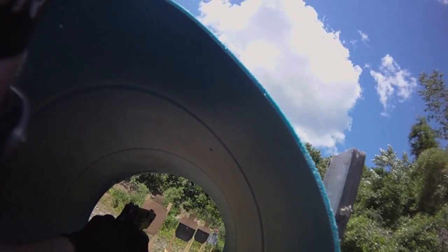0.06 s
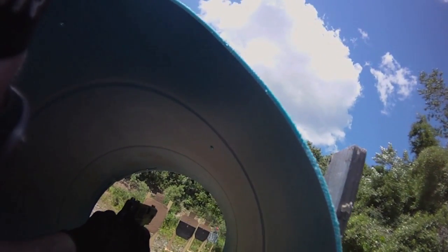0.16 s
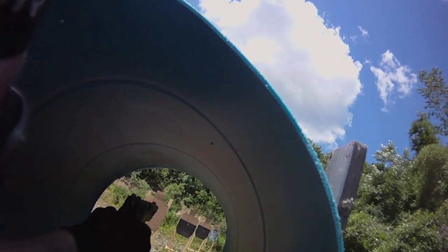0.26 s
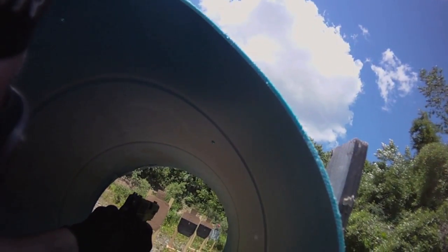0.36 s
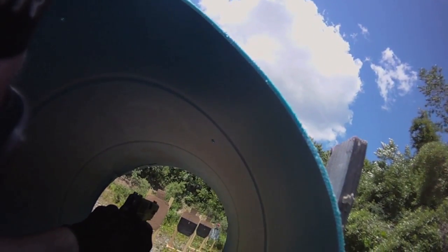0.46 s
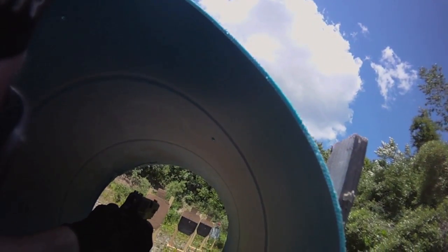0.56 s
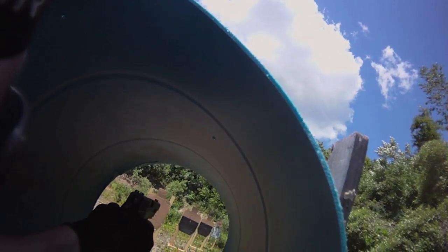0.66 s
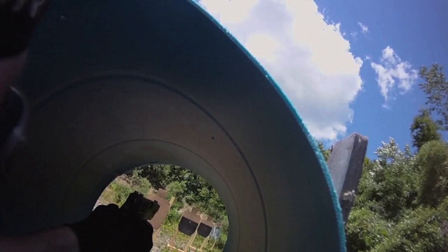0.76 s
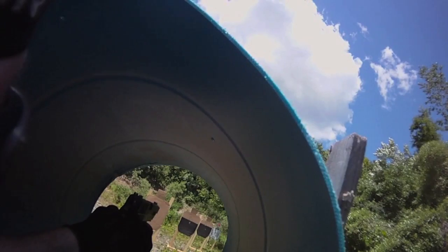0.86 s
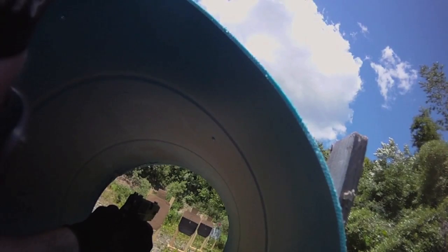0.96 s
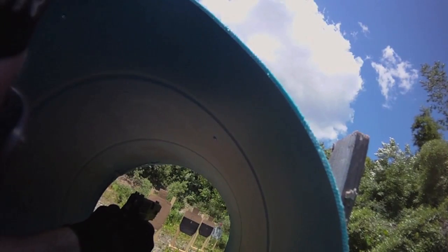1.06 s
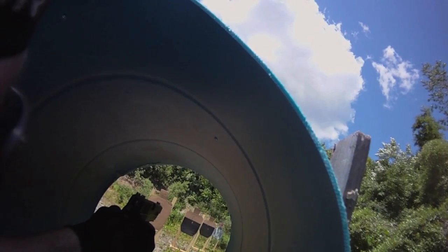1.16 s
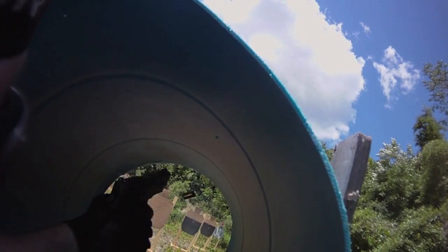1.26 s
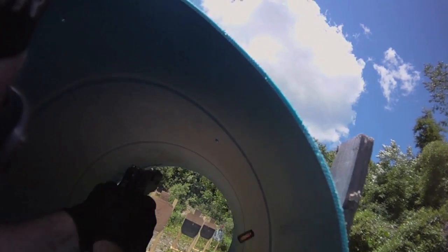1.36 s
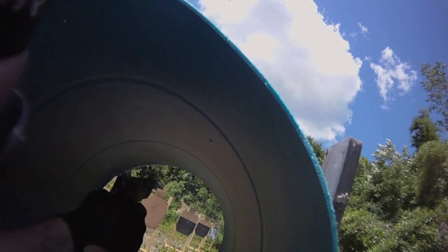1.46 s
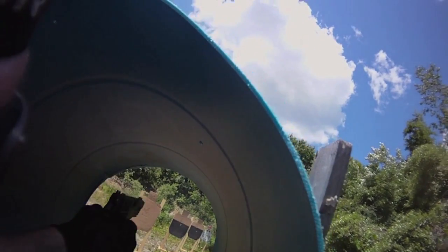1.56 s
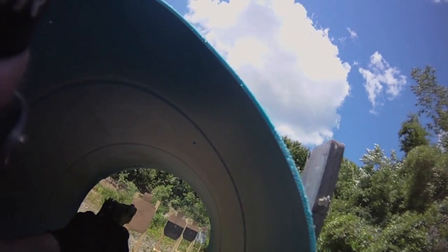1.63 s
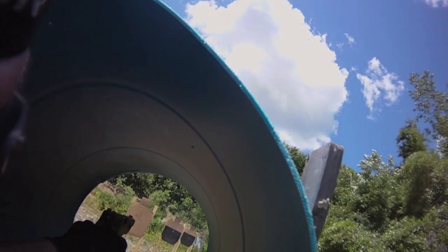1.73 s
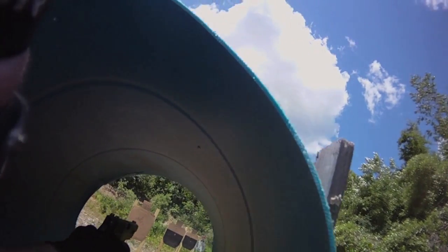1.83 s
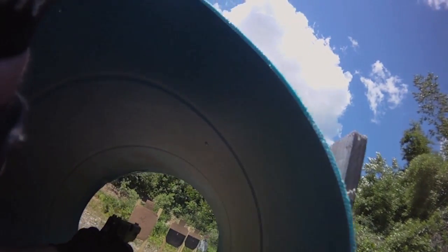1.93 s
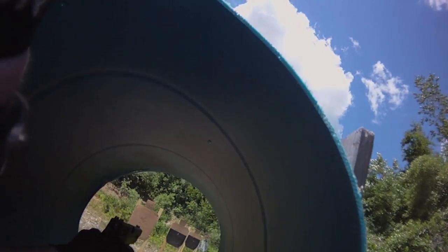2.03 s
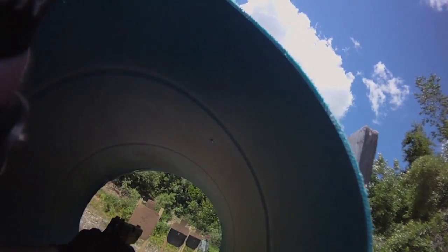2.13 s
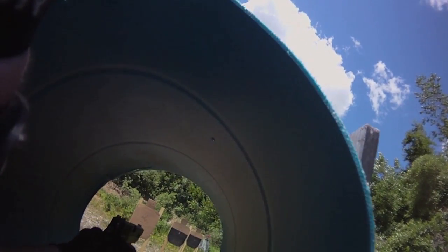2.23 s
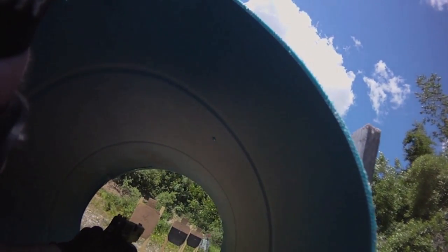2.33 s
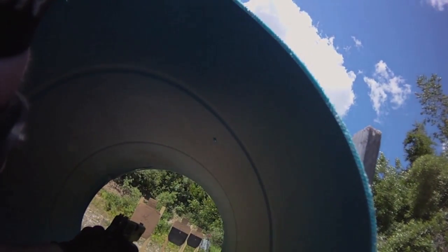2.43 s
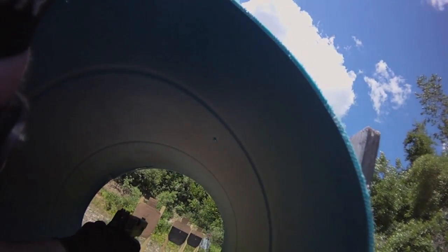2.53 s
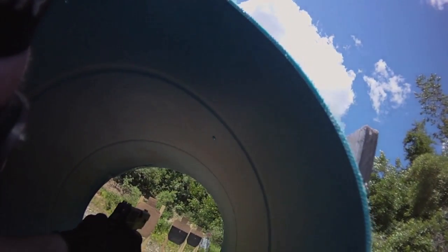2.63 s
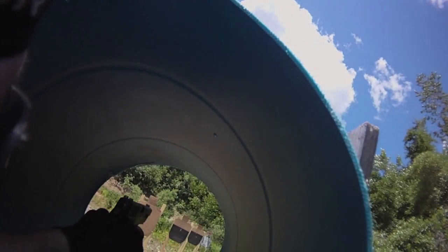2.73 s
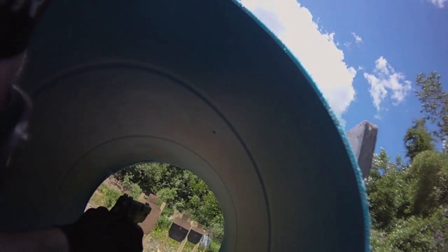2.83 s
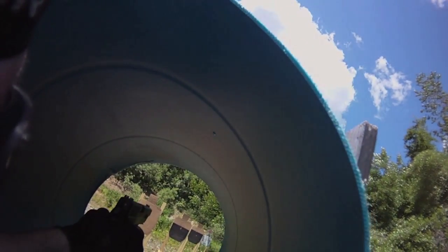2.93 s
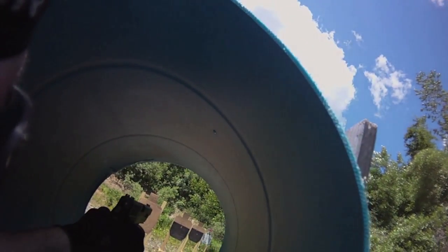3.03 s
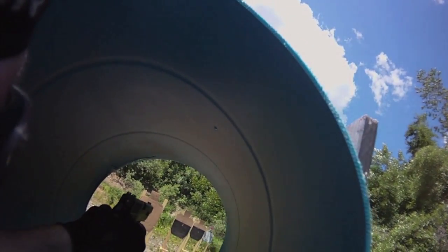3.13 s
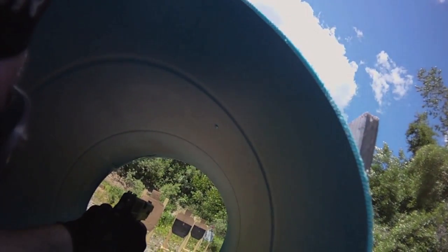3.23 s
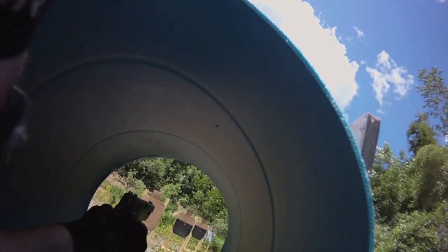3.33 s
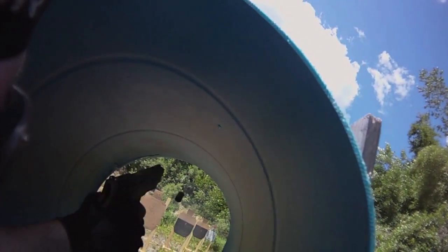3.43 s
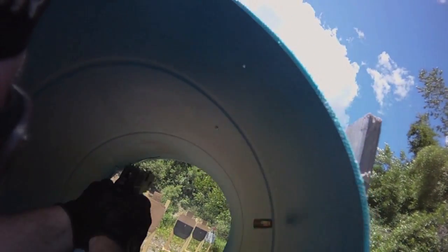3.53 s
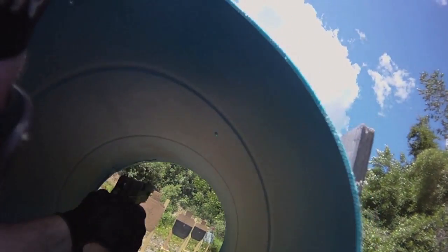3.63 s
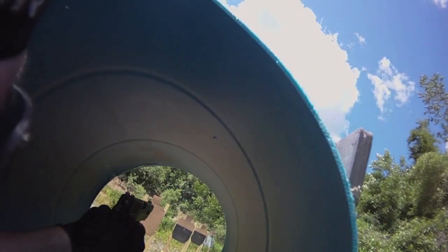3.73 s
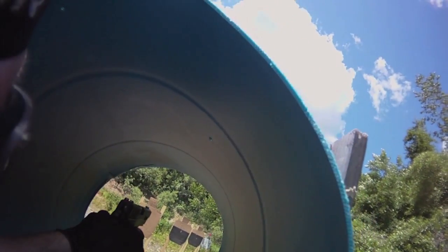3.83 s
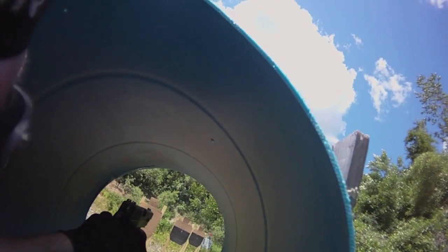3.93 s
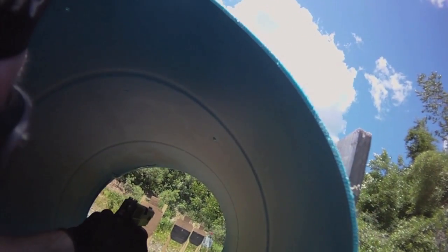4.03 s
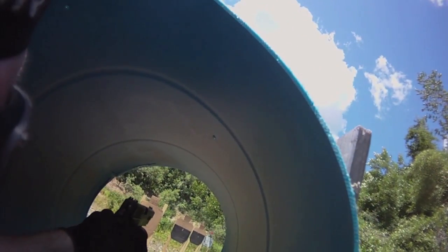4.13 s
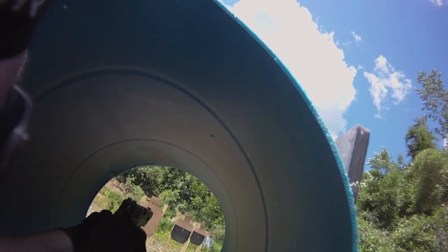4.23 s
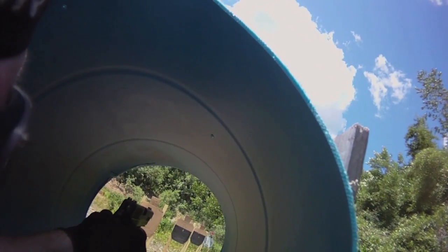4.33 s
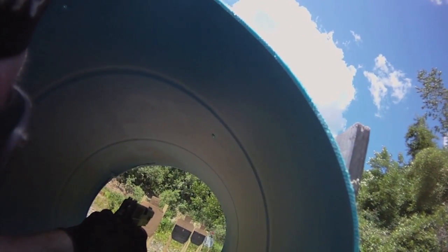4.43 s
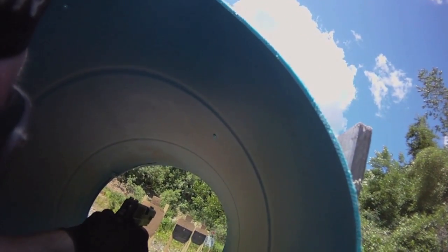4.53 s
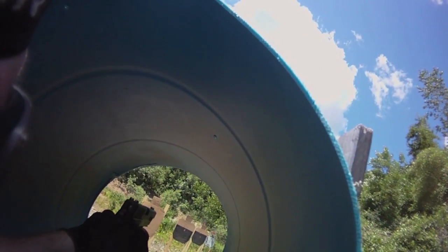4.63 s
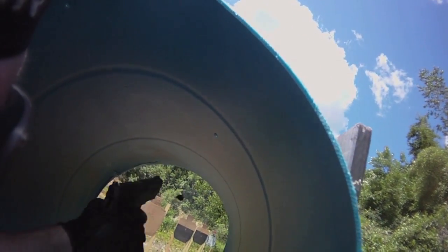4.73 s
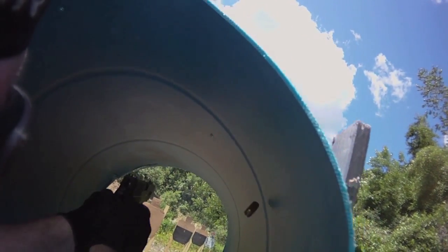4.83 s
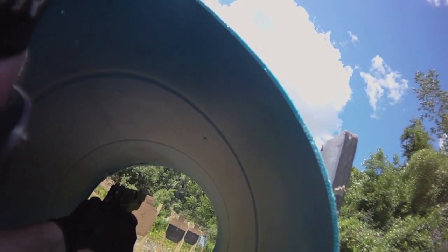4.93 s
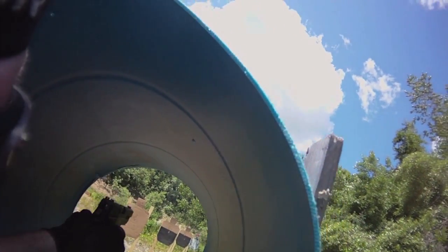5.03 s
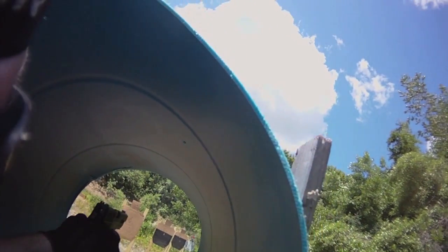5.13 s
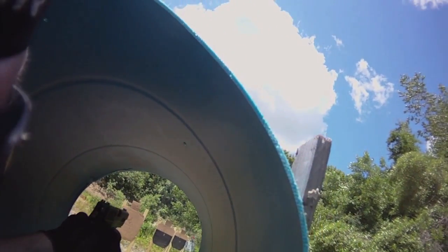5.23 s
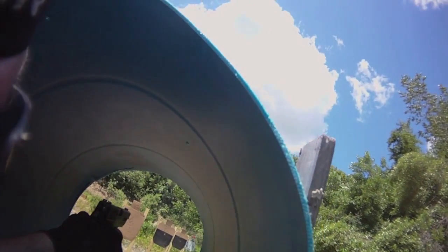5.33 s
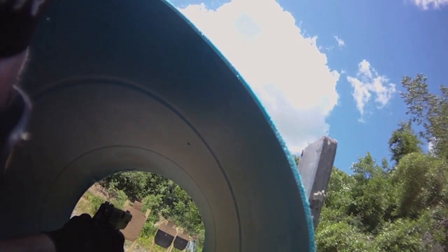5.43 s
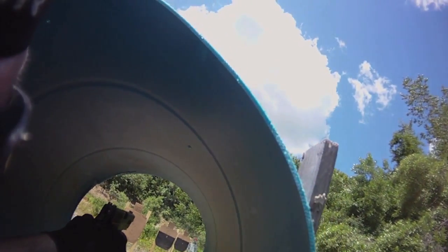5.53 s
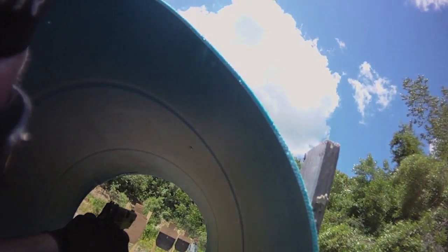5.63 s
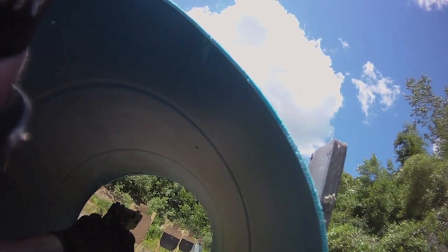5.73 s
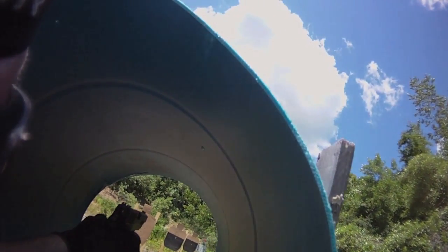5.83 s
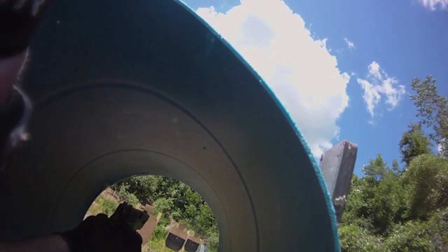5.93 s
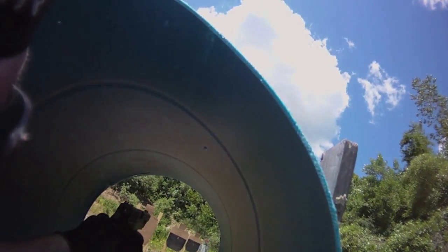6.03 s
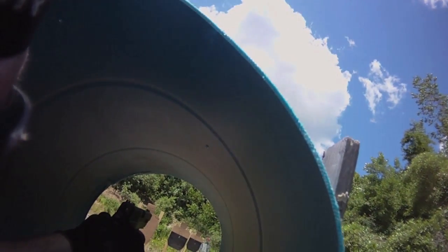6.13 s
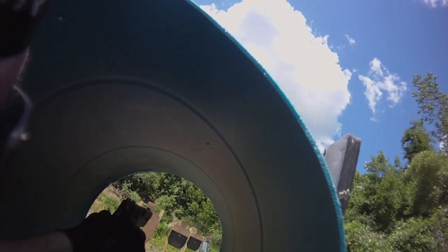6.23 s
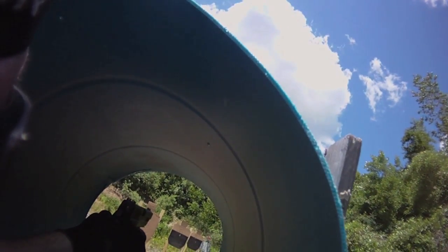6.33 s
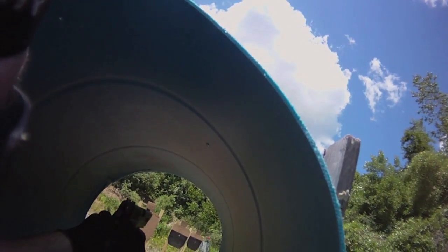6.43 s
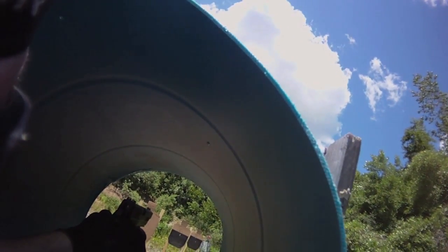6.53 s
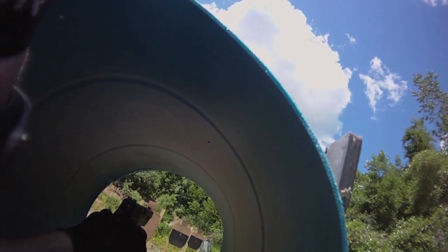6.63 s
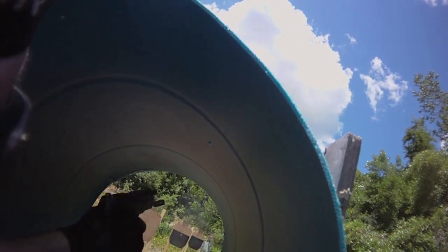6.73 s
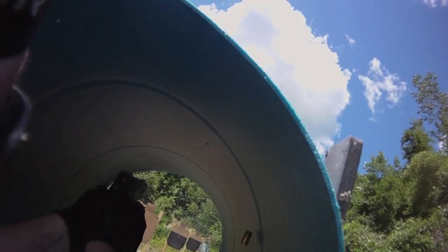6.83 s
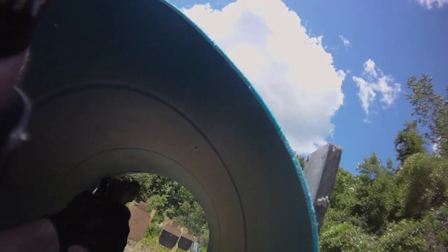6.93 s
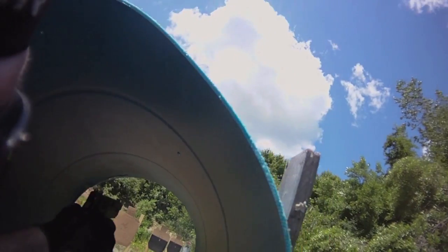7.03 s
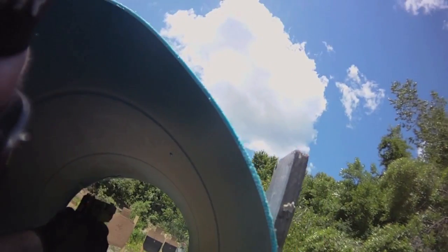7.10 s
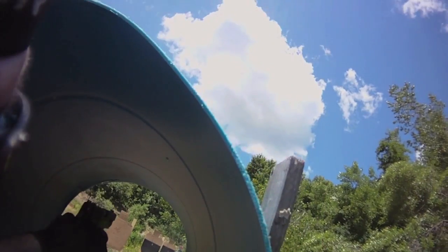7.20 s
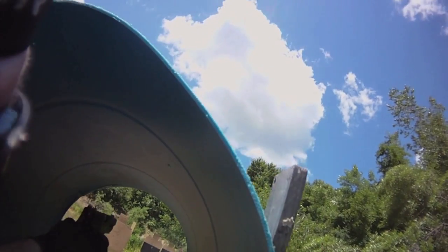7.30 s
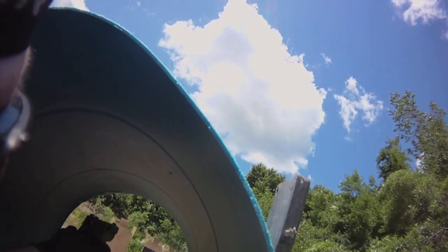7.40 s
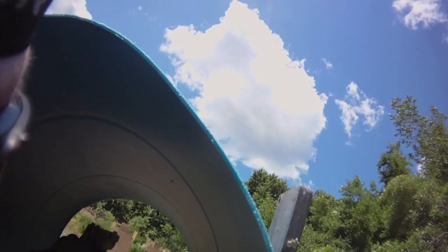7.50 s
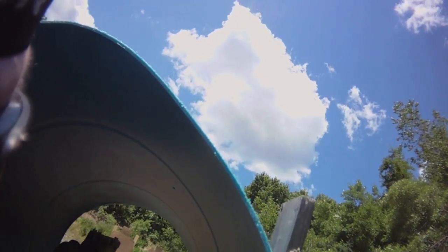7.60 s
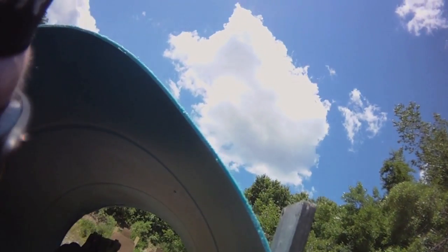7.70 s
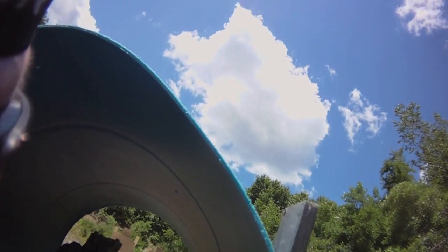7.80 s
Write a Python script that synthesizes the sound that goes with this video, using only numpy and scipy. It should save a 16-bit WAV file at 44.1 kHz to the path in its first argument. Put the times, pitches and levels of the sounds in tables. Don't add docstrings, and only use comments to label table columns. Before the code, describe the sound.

Close pistol fire, four spaced blasts with short hollow drum ring and woodland echo, brass cases rattling between, faint birds and one distant shot near the end.

```python
import sys
import numpy as np
from scipy import signal
from scipy.io import wavfile
from scipy.ndimage import uniform_filter1d

SR = 44100
rng = np.random.default_rng(int(sys.argv[2]) if len(sys.argv) > 2 else 0)


def pcm_store(signal):
    levels = np.round(np.clip(np.atleast_2d(signal), -1, 1) * 32767)
    wavfile.write(sys.argv[1], SR, levels.astype(np.int16).T)


def rack_gain(trim_db):
    fader = np.asarray(trim_db, float)
    return 10 ** (fader / 20)


N = 346626
CEILING = .78


def evened(x):
    return x / np.sqrt(np.mean(x ** 2) + 1e-20)


def read(points, hz):
    f, value = np.transpose(points)
    return np.interp(np.log(hz + 1), np.log(f + 1), value)


def curve(points, t):
    return np.interp(t, *np.transpose(points))


def add(mix, s, sound):
    part = mix[round(s * SR):][:len(sound)]
    part += sound[:len(part)]


def resonate(x, hz, width):
    turn = np.exp(2j * np.pi * np.cumsum(hz * np.ones(len(x))) / SR)
    pole = np.exp(-np.pi * abs(width) / SR)
    smooth = signal.lfilter([1 - pole], [1, -pole], x / turn)
    return 2 * (turn * smooth).real


def noise(colour, size, loss_db=None, patchy_db=5.5, flicker_db=-0.34):
    frames, hz = size // 128 + 5, np.fft.rfftfreq(512, 1 / SR)[:, None]
    a, b, patches = rng.standard_normal((frames, len(hz), 3)).T
    flicker = evened(uniform_filter1d(patches[0], size=3))
    patches = uniform_filter1d(patches, size=6, axis=0)
    patches = evened(uniform_filter1d(patches, size=8, axis=1))
    shape = rack_gain(read(colour, hz))
    shape = shape / np.sqrt(np.mean(shape ** 2)) / np.sqrt(2 * 384)
    z = (a + 1j * b) * shape * rack_gain(patchy_db * patches + flicker_db * flicker)
    if loss_db:
        z = z * rack_gain(loss_db(hz, np.arange(frames) * 128 / SR))
    return 2 * signal.istft(z, nperseg=512, noverlap=384)[1][:size]


# top t/s, top level/dB, hold t/s, fade/(dB/s)
RUMBLE_SWELLS = [
    (0, -58.5, 0.059, -10.5),
    (2.199, -59, 0.18, -27.5),
    (4.3, -59, .05, -39),
    (5.501, -58, 0.66, -240),
    (6.593, -77, 0.18, -31),
    (7.499, -54.5, .1, -18),
]


def swelling(t):
    top, db, hold, fade_db = np.transpose(RUMBLE_SWELLS)[:, :, None]
    rise_db = 25
    level = db + rise_db * np.minimum(t - top, 0) + fade_db * np.maximum(t - top - hold, 0)
    return np.sqrt((rack_gain(level) ** 2).sum(axis=0))


# f/Hz, level/(dB per Hz)
RUMBLE_SPECTRUM = [(50, -29.5), (120, -32.5), (172, -17.5), (260, -33), (400, -8.5), (560, 3), (760, -4.5),
                   (1050, -8), (2200, -14), (4200, -21), (4800, -31), (8000, -38.5)]
# f/Hz, level/(dB per Hz)
HISS_SPECTRUM = [(30, -4.5), (100, -8.5), (200, -12), (330, -9), (560, 0), (800, -8.5), (1300, -12),
                 (2600, -12), (4200, -13.5), (4900, -16.5), (8000, -18), (15250, -20), (15450, -44)]
# f/Hz, level/dB
CAMERA_WHISTLES = [(5570, -97), (7790, -95), (11090, -92)]


def background():
    t = np.arange(N) / SR
    rumble = swelling(t) * noise(RUMBLE_SPECTRUM, size=N, patchy_db=1.0)
    hiss = rack_gain(-70.5) * noise(HISS_SPECTRUM, size=N, patchy_db=1.3)
    whistles = sum(rack_gain(db) * evened(resonate(rng.standard_normal(N), hz, 35)) for hz, db in CAMERA_WHISTLES)
    return rumble + hiss + whistles


def bird(length, start_hz, end_hz, db):
    hz = np.linspace(start_hz, end_hz, round(length * SR))
    wobble, leaves = rng.standard_normal((2, round(.08 * SR)))
    wobble = evened(uniform_filter1d(wobble, size=160))[:len(hz)]
    note = signal.windows.tukey(len(hz), .6) * np.sin(2 * np.pi * np.cumsum(hz) / SR + .5 * wobble)
    blur = leaves * np.exp(-np.arange(len(leaves)) / (.03 * SR))
    return rack_gain(db) * (np.pad(note, (0, len(blur) - 1)) + .02 * signal.fftconvolve(note, blur))


def knock(db, hz, rattle_s, thud_db, treble_db):
    t = np.arange(0, .1, 1 / SR)
    grit, fizz, hollow = rng.standard_normal((3, len(t)))
    wall = evened(resonate(resonate(grit, hz, 0.45 * hz), hz, .9 * hz))
    brass = resonate(resonate(fizz, 6600, 3000), 6600, 3000)
    brass = evened(brass + .13 * np.diff(fizz, prepend=0))
    thud = evened(resonate(resonate(resonate(hollow, 650, 400), 650, 400), 650, 600))
    fall = np.exp(-t / rattle_s) + 3 * np.exp(-t / .0006) + .08 * np.exp(-t / .018)
    swell = np.minimum(t / .004, 1) * np.exp(-t / .016)
    return rack_gain(db - 15.5) * ((wall + rack_gain(treble_db) * brass) * fall + rack_gain(thud_db) * thud * swell)


def chime(db, hz, free_s):
    t = np.arange(0, .4, 1 / SR)
    spin = uniform_filter1d(rng.standard_normal(len(t)), size=220)
    spin = evened(uniform_filter1d(spin, size=220))
    t60, linger_db = 0.4, -24
    damping_db = np.maximum(-900 * np.maximum(t - free_s, 0), linger_db)
    level = rack_gain(db - 60 * t / t60 + damping_db + 2.4 * spin)
    return level * np.sin(2 * np.pi * hz * t + .5 * spin) * np.minimum(t / 0.0013, 1)


# t/s, peak level/dB, centre f/Hz, brass treble level/dB
FLAT_LANDINGS = [(.1594, -56, 1990, -9), (1.5789, -11, 3220, -13), (1.6222, -19, 2300, -33),
                 (1.7195, -21, 2090, -14), (1.8584, -17.5, 1510, -33), (1.8686, -16, 1800, -31),
                 (1.8994, -22, 1910, -36), (2.596, -47, 4120, -36), (3.599, -5.5, 3080, -21.5),
                 (3.7832, -12, 1950, -23), (5.228, -14, 2050, -15), (5.2816, -26.5, 2580, -24),
                 (6.19, -37, 2930, -28.5), (7.239, -35, 1780, -25), (7.356, -41, 1590, -28.5)]
# t/s, peak level/dB, centre f/Hz, brass treble level/dB
RIM_LANDINGS = [(.187, -43.5, 5090, -5), (1.7358, -11, 3160, -22), (1.9188, -24.5, 1820, -35),
                (3.127, -58.5, 1610, -12), (3.7693, -12, 3730, -11), (4.8924, -11.5, 3060, -18),
                (4.9139, -26, 3030, 10), (5.044, -15.5, 2700, -8), (5.117, -7, 2300, -3.5),
                (5.2539, -23.5, 2610, -28), (5.805, -43, 1940, -25.5), (5.835, -43.5, 1950, -24.5),
                (5.9946, -38, 2730, -30.5), (6.172, -27.5, 2630, -33), (6.548, -58, 1980, -21),
                (7.0632, -11.5, 2060, -8.5), (7.089, -14.5, 3550, -20), (7.0964, -16.5, 2060, -6),
                (7.2015, -18, 4430, -17), (7.418, -39.5, 2330, -35), (7.458, -37, 2290, -30),
                (7.6035, -33.5, 1594, -14)]
# t/s, peak level/dB, f/Hz, free t/s before the wall damps them
BRASS_CHIMES = [(.1906, -62, 11393, 0.043), (1.49, -44, 11466, 0.031), (1.578, -34, 11350, 0.01),
                (1.64, -66, 11390, .02), (1.69, -66, 11500, .05), (1.76, -64, 11358, .05),
                (1.869, -61.5, 11385, .08), (2.19, -68.5, 11300, .012), (2.595, -66, 11428, .03),
                (2.87, -76, 11420, 0.026), (3.59, -40, 11400, 0.09), (3.705, -64, 11689, .06),
                (3.835, -63, 11681, .1), (3.945, -69, 11500, 0.027), (4.868, -37.5, 11400, .09),
                (4.92, -45, 11570, 0.13), (5.05, -64, 11490, .06), (5.1164, -32, 11300, 0.022),
                (5.155, -53, 11400, 0.14), (5.345, -63, 11330, 0.065), (5.835, -65, 11531, .05),
                (5.995, -74, 11353, .025), (6.082, -75.5, 11342, .05), (6.172, -64, 11500, .02),
                (6.19, -62, 11372, 0.044), (6.92, -47, 11300, .13), (7.1, -56, 11350, 0.12),
                (7.205, -28, 11400, 0.03), (7.251, -46.5, 11440, 0.067), (7.6033, -52, 11340, 0.048)]


def cases():
    mix = np.zeros(N)
    hits = [(*row, .0087, 2.5) for row in FLAT_LANDINGS]
    hits += [(*row, .0067, -18) for row in RIM_LANDINGS]
    for s, db, hz, treble_db, rattle_s, thud_db in sorted(hits):
        add(mix, s, knock(db, hz, rattle_s, thud_db, treble_db))
    for s, db, hz, free_s in BRASS_CHIMES:
        add(mix, s, chime(db, hz, free_s))
    return mix


def rolling(t, slap_s, slap_db, width_s, hold_db, hold_s, fall_db, late_db, late_fall_db):
    slap = slap_db * np.exp(-((t - slap_s) / width_s) ** 2)
    near = rack_gain(hold_db + slap + fall_db * np.maximum(t - hold_s, 0))
    return np.hypot(near, rack_gain(late_db + late_fall_db * t))


# f/Hz, level/(dB/s); serves the near echoes too
AIR_LOSS = [(100, 2.5), (500, 4), (1500, 3), (2800, -12), (4200, -11.5), (5000, -24), (7000, -34),
            (15000, -41)]
# f/Hz, level/(dB per Hz)
FAR_ECHO_SPECTRUM = [(60, -25), (130, -17.5), (250, -27), (420, -6), (600, 3.5), (800, -5.5), (1150, -15.5),
                     (1650, -6.5), (2100, -11.5), (2500, -14), (4100, -22.5), (5300, -30.5), (9000, -59),
                     (12000, -80)]
FAR_ECHO_ROLL = dict(slap_s=.001, slap_db=6, width_s=0.022, hold_db=-2, hold_s=.22, fall_db=-49.5, late_db=-14, late_fall_db=-9.5)


def far_shot(db, hz, push_db, echo_db):
    t = np.arange(SR) / SR
    thump = -np.sin(2 * np.pi * hz * t) * rack_gain(-60 * t / 0.0091) * np.minimum(t / 0.0018, 1)
    ground = ((.0056, .55), (.0092, -.45), (.0145, .3))  # (delay s, share)
    thump = thump + sum(share * np.roll(thump, round(delay * SR)) for delay, share in ground)
    push = 1.3 * (1 - t / 0.0017) * np.exp(-t / 0.0018)
    push = push + 0.16 * np.sin(2 * np.pi * 130 * t) * np.exp(-t / 0.0064)
    direct = thump + rack_gain(push_db) * push * np.minimum(t / 0.00084, 1)

    def dull(f, s):
        return 1.2 * read(AIR_LOSS, f) * s

    roll = noise(FAR_ECHO_SPECTRUM, size=SR, loss_db=dull, patchy_db=2.3, flicker_db=1.5)
    roll = roll * rack_gain(echo_db) * rolling(t, **FAR_ECHO_ROLL)
    return rack_gain(db) * direct + roll * np.minimum(t / 0.0033, 1)


# f/Hz, level/(dB per Hz)
GAS_SPECTRUM = [(60, -22), (300, -10.5), (1400, -8.5), (2000, -1), (3600, -4), (4600, -9), (6500, -9.5),
                (8500, -15.5), (14500, -23.5), (16000, -34.5)]
# t/s after the shot, f/Hz
SPIRAL_WHINE = [(0, 3900), (.007, 3600), (.011, 2300), (.017, 2000), (.03, 1850)]
# t/s after the shot, level/dB
BLAST_PUSH = [(-.007, -52), (-.002, -32), (-.001, -15.5), (.001, 9.5), (.011, 5.5), (.017, -9), (.03, -15),
              (.05, -25.5), (.09, -33.5)]


def blast():
    t = np.arange(-.008, .1, 1 / SR)
    grit = rng.standard_normal(len(t))
    waver = evened(uniform_filter1d(rng.standard_normal(len(t)), size=90))
    hz = curve(SPIRAL_WHINE, t) * (1 + 0.037 * waver)
    whine = evened(resonate(resonate(grit, hz, 2200), hz, 1600))
    wall = sum((-1) ** k * resonate(grit, mode[0], 47) for k, mode in enumerate(DRUM_MODES) if mode[0] > 900)
    gas = noise(GAS_SPECTRUM, size=len(t)) + 0.47 * evened(wall)
    share = np.clip(.55 - 12 * np.maximum(t - .015, 0), 0, 1)
    crossing = np.cos(2 * np.pi * np.cumsum(445 + .04 * hz) / SR)
    slaps = 1 + CEILING / 2 * np.clip(t / .02, 0, 1) * crossing
    return rack_gain(curve(BLAST_PUSH, t)) * slaps * (share * whine + (1 - share) * gas)


# f/Hz, level/(dB per Hz)
TREE_SPECTRUM = [(29, -74), (50, -49.5), (145, -26), (271, -22.5), (532, 2), (842, -9), (997, -6.5),
                 (2400, -10), (3250, -13), (4000, -10.5), (4550, -21), (7100, -25), (8000, -30),
                 (11700, -39.5), (14900, -48), (16000, -74.5)]
TREE_ROLL = dict(slap_s=.12, slap_db=5, width_s=0.011, hold_db=1, hold_s=0.19, fall_db=-56, late_db=-13.5, late_fall_db=-25.5)
# f/Hz, width f/Hz, level/dB, fade/(dB/s)
AIR_COLUMN = (170.5, 19.5, -14.5, -43.5)


def echoes():
    t = np.arange(2 * SR) / SR
    hz, width, db, fade_db = AIR_COLUMN
    hum = resonate(resonate(rng.standard_normal(len(t)), hz, width), hz, 2 * width)
    hum = evened(hum) * rack_gain(db + fade_db * t)

    def dull(f, s):
        return read(AIR_LOSS, f) * (s - .2)

    trees = noise(TREE_SPECTRUM, size=len(t), loss_db=dull, patchy_db=1.5, flicker_db=0.0)
    return rolling(t, **TREE_ROLL) * trees + hum


# f/Hz, level/dB, t60/s
DRUM_MODES = [(172, -20, .25), (445, 0, 1.), (460.5, -2, 2.), (551, -18, .8), (731, -10, 1.),
              (997, -10, .8), (1065, -20, .8), (1261, -10, .8), (1505, -21, .6), (1762, -9, .7),
              (1855, -21, .6), (1951, -19, .6), (2012, -13, .7), (2050, -8, .7), (2335, -20, .5),
              (2450, -20, .5), (2515, -18, .6), (2695, -20, .5), (2742, -11, .7), (2775, -15, .7),
              (2835, -20, .5), (3024, -11, 1.), (3144, -21, .5), (3310, -14, .8), (3585, -19, .6),
              (3770, -19, .6), (3853, -14, .7), (4113, -18, .5), (4474, -21, .4)]
# t/s after the shot, level/dB
GRIP_SWING = [(0, -9), (.03, -3.5), (.11, 1), (.14, -7.5), (.2, -36.5), (.4, -56)]


def drum():
    t = np.arange(0, .4, 1 / SR)
    hz, db, t60 = np.transpose(DRUM_MODES)[:, :, None]
    luck, *steps = rng.standard_normal((len(DRUM_MODES), 25)).T
    knots = np.linspace(0, .4, len(steps))
    waver = np.array([np.interp(t, knots, s) for s in np.transpose(steps)])
    upper = hz > 500
    level = rack_gain(db - 60 * t / t60 + upper * (2.5 + 2.2 * luck[:, None] + 1.7 * waver))
    sign = (-1) ** np.arange(len(DRUM_MODES))[:, None]
    modes = sign * level * np.sin(2 * np.pi * hz * t + .4 * upper * waver)
    return rack_gain(curve(GRIP_SWING, t)) * modes.sum(axis=0)


def slide(length, hz, db):
    grit = rng.standard_normal(round(.1 * SR))[:round(length * SR)]
    rub = resonate(resonate(grit, hz, 0.42 * hz), hz, 0.42 * hz)
    return rack_gain(db) * evened(rub) * signal.windows.tukey(len(grit), .5)


# t/s, length t/s, start f/Hz, end f/Hz, level/dB
BIRD_NOTES = [
    (.09, 0.054, 3950, 4200, -68),
    (.645, 0.045, 6340, 6530, -72),
    (.89, 0.038, 3203, 3440, -60),
    (.915, 0.032, 3200, 2550, -64.5),
    (.99, 0.029, 2300, 2120, -64),
    (2.41, .04, 4930, 5200, -68),
    (2.72, 0.046, 2140, 1890, -67.5),
    (3.39, .05, 4370, 3830, -75.5),
    (3.415, .02, 3300, 3250, -67),
]
# t/s, peak level/dB, thump f/Hz, low push level/dB, echo level/dB
FAR_SHOTS = [
    (0.3112, -35.5, 785, -1, -45),
    (.3605, -44, 800, 2, -61),
    (7.728, -3, 775, -16.5, -37),
]
# t/s, peak level/dB, ring level/dB, echo level/dB
NEAR_SHOTS = [
    (1.311, -4, -13, -27),
    (3.478, -3, -14.5, -27),
    (4.783, -3.5, -15, -26.5),
    (6.806, -4, -13.5, -27),
]
# t/s, length t/s, f/Hz, level/dB
CASE_SLIDES = [(1.612, 0.032, 13400, -72), (1.765, 0.023, 570, -34), (2.187, .008, 4900, -69.5),
               (2.25, 0.012, 804, -53), (2.452, 0.012, 2000, -63.5), (2.866, .008, 4900, -68.5),
               (5.352, 0.0075, 3480, -50), (2.801, 0.008, 613, -54), (2.975, 0.01, 300, -66),
               (3.768, 0.026, 3000, -42), (5.233, 0.025, 730, -40.5), (6.085, 0.019, 570, -56.5),
               (6.176, 0.06, 524, -53.5), (6.175, 0.049, 2500, -61), (7.098, 0.02, 540, -29.5),
               (7.205, 0.028, 12400, -46)]


def scene():
    mix = background()
    for s, db, ring_db, echo_db in NEAR_SHOTS:
        add(mix, s - .008, rack_gain(db + 5) * blast())
        add(mix, s + .004, rack_gain(ring_db) * drum())
        add(mix, s, rack_gain(echo_db) * echoes())
    for s, *how in FAR_SHOTS:
        add(mix, s, far_shot(*how))
    mix = mix + cases()
    for table, source in ((CASE_SLIDES, slide), (BIRD_NOTES, bird)):
        for s, *how in table:
            add(mix, s, source(*how))
    return mix[None]


def roll_off(x):
    return signal.sosfilt(signal.butter(12, 16590, fs=SR, output="sos"), x)


def record(dry):
    held = dry / (1 + abs(dry / CEILING) ** 3) ** (1 / 3)
    held = signal.lfilter(*signal.butter(1, 90 / (SR / 2), "high"), held)
    held = signal.oaconvolve(held, signal.firwin(95, 15500, fs=SR)[None], "same")
    return roll_off(held)


dry = scene()
out = record(dry)
pcm_store(out)
```